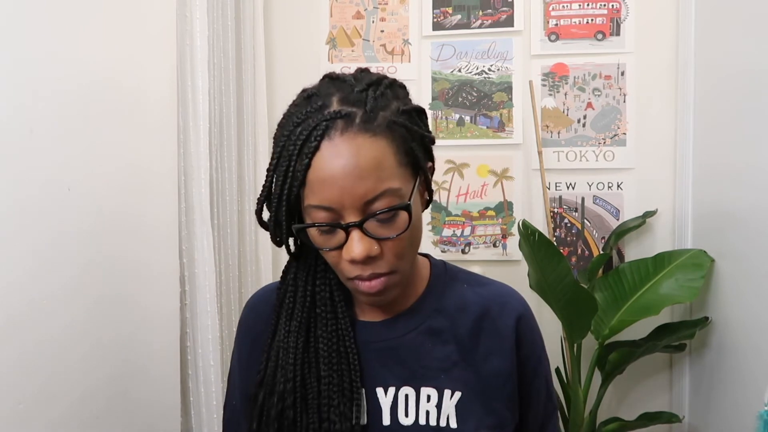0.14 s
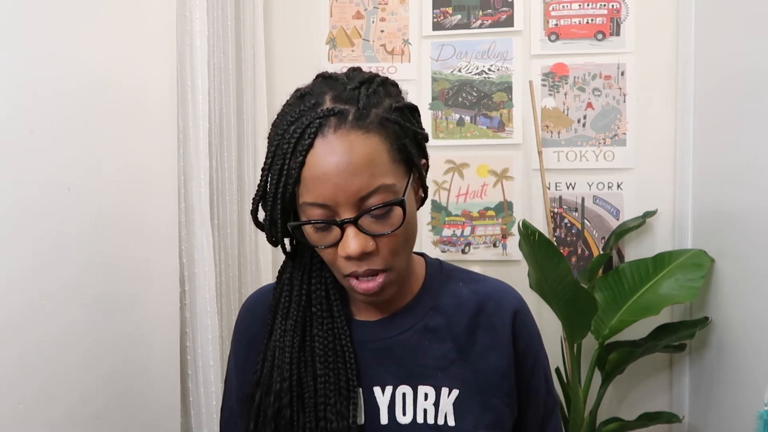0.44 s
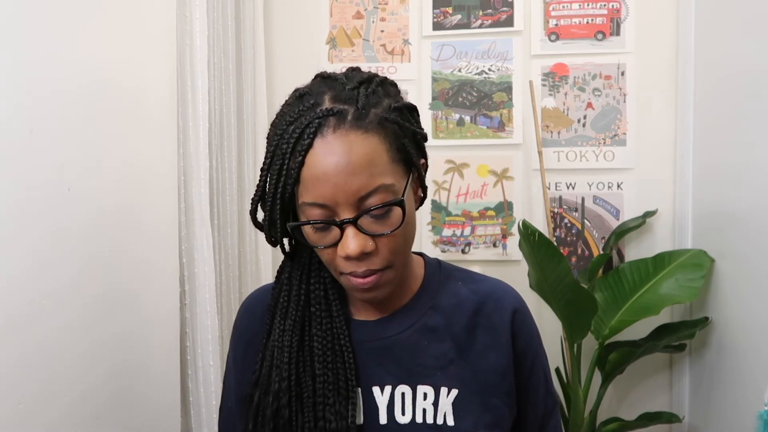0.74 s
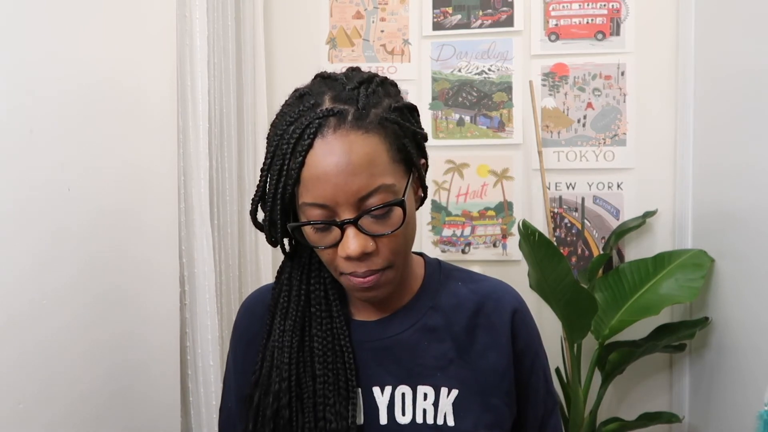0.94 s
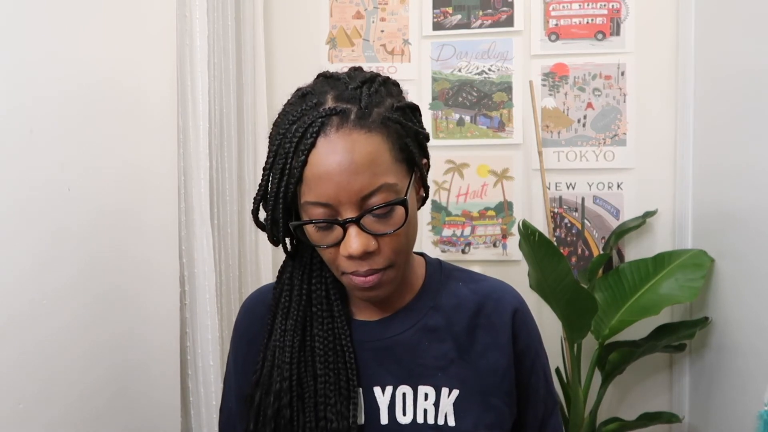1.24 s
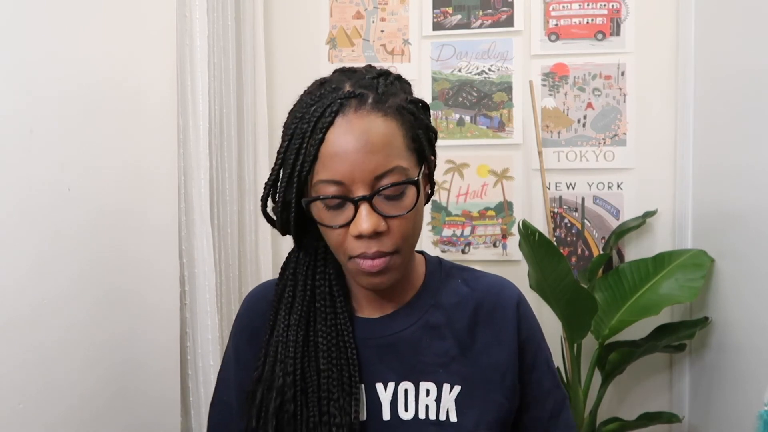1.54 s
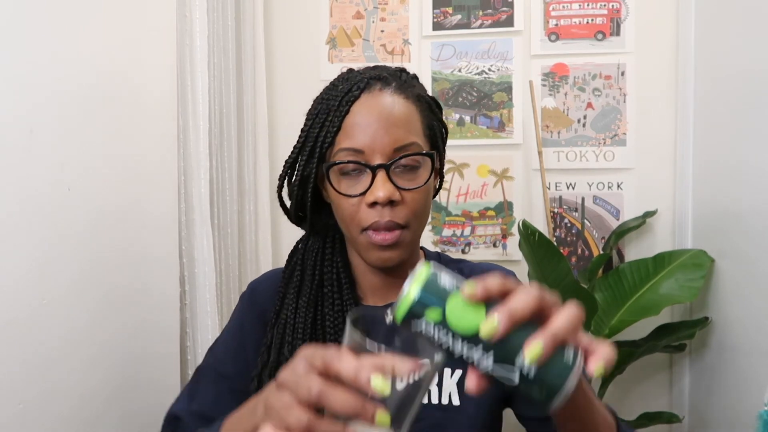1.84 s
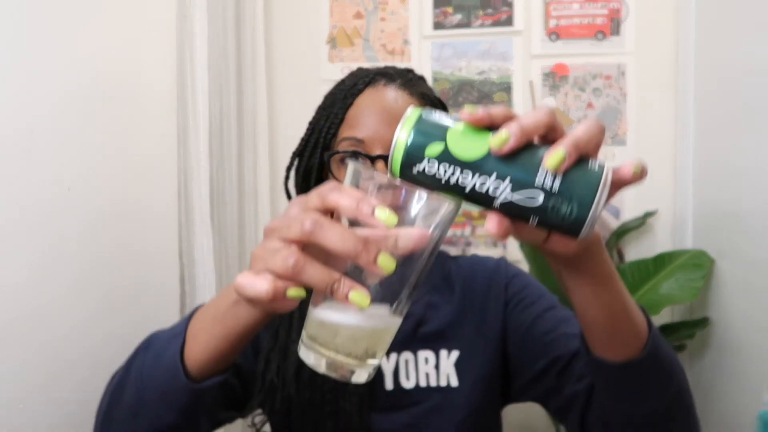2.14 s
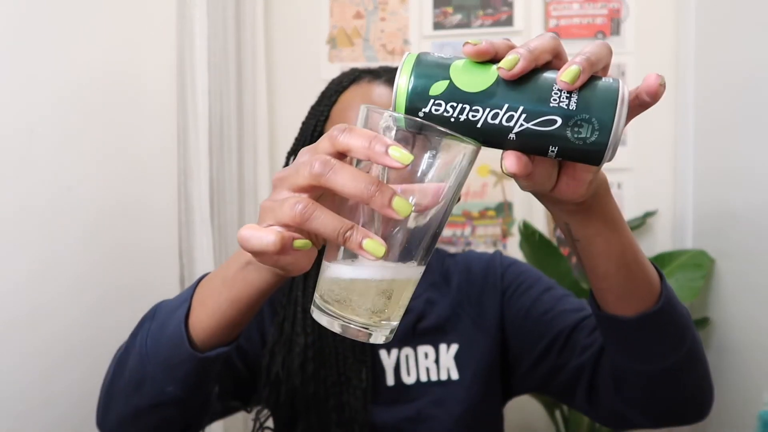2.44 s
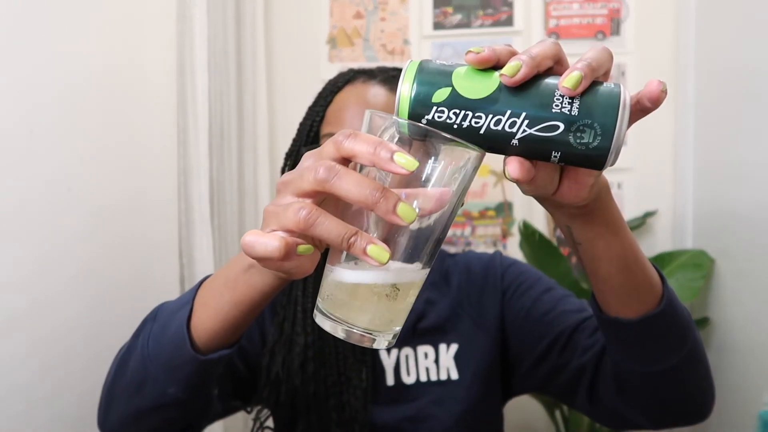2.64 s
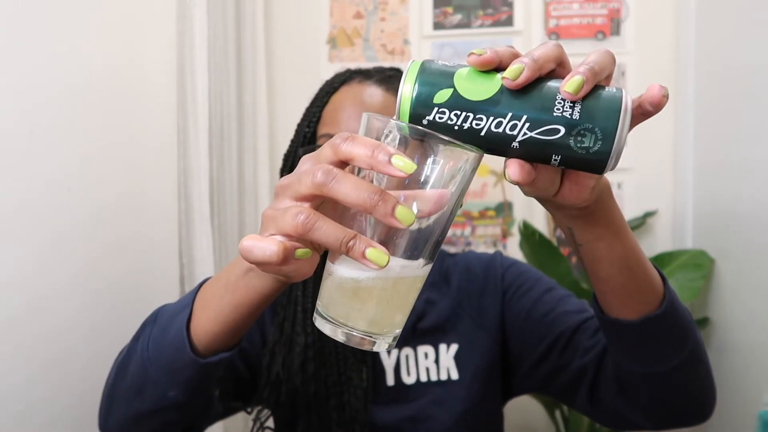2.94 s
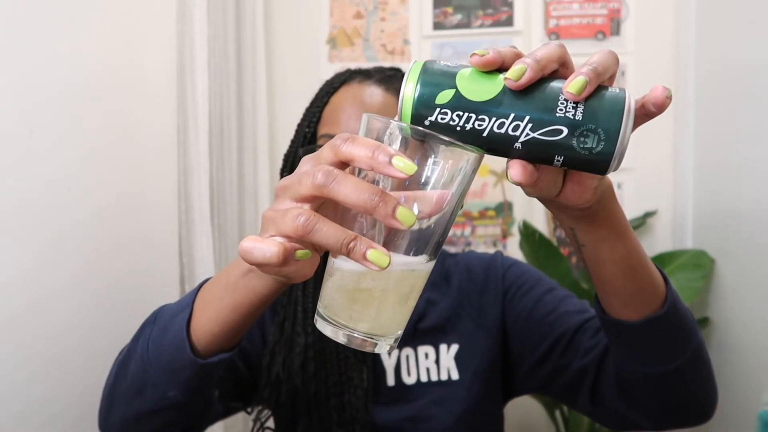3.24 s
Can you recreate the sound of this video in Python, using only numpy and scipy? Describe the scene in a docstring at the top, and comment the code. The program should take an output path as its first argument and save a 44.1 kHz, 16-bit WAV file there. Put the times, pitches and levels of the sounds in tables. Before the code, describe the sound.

Sparkling drink glugs and splashes into a glass, fizzing, with two light knocks near the end

```python
"""Fizzy juice poured from a can

Juice gushes into a glass in a small room in two spells of gulps, splashes and droplets; foam fizzes on.
Bubbles and blobs are damped sines, splashes and spits are noise puffs, and dense grains make foam and jet.
Resonant filters stand for the air in the glass and for the can, which knock lightly together twice.
An appliance hums, the building rumbles underneath and a faint hiss lies over all."""
import sys
import numpy as np
from scipy import signal
from scipy.fft import rfft, irfft, next_fast_len
from scipy.io import wavfile

SR = 44100
rng = np.random.default_rng(int(sys.argv[2]) if len(sys.argv) > 2 else 0)


def to_wav(sig):
    """Store sig (one row per channel, or 1-D mono) as 16-bit WAV at the path in sys.argv[1].

    Samples outside -1..1 are clipped; the rate is SR.
    """
    pcm = np.clip(np.atleast_2d(sig), -1, 1) * 32767
    pcm = np.round(pcm).astype(np.int16)
    wavfile.write(sys.argv[1], SR, pcm.T)  # frames by channels


N = 149940  # length in samples

# Lowest note of the air in the glass. Each row: time in seconds, frequency in Hz.
GLASS_NOTE = [(.4, 639), (.75, 667), (1.0, 684), (1.35, 722), (1.55, 754), (1.66, 774), (1.9, 696),
              (2.4, 681), (3.0, 697), (3.4, 750)]


def amp(db):
    """A level in decibels is 20 times the logarithm of an amplitude ratio."""
    return 10 ** (np.asarray(db) / 20)


def unit(x):
    """Dividing by the root mean square leaves a signal of unit power."""
    return x / np.sqrt(np.mean(x ** 2) + 1e-20)


def along(points, hz):
    """Values given at a few frequencies are interpolated on a logarithmic frequency axis."""
    f, values = np.transpose(points)
    return np.interp(np.log(hz + 1), np.log(f), values)


def gains(rows):
    """Levels interpolated linearly in dB become one gain per sample for each column after the time."""
    s, *columns = np.transpose(rows)
    t = np.arange(N) / SR
    return [amp(np.interp(t, s, levels)) for levels in columns]


def add(out, s, sound):
    """Superposition: a sound is summed into the mix from the given second on."""
    part = out[max(0, round(s * SR)):][:len(sound)]
    part += sound[:len(part)]


def coloured(x, points, resonances=()):
    """Minimum-phase filter of unit power, from a broad colour and resonances (Hz, width Hz, dB)."""
    m = 2 * next_fast_len(N // 2 + 8192)
    hz = np.fft.rfftfreq(m, 1 / SR)
    peaks = sum(amp(db) ** 2 / (1 + (2 * (hz - f) / width) ** 2) for f, width, db in resonances)
    magnitude = unit(amp(along(points, hz)) * np.sqrt(1 + peaks))
    # Folding the cepstrum onto positive times makes the response causal.
    cepstrum = irfft(np.log(magnitude))
    cepstrum[1:m // 2] *= 2
    cepstrum[m // 2 + 1:] = 0
    return irfft(rfft(x, m) * np.exp(rfft(cepstrum)), m)[:N]


def grains(per_s, low_hz, high_hz, cycles, spread_db, size):
    """Many tiny bubbles at random times, each a sine decaying by 1/e in the given cycles, sum to rms 1."""
    when, pitch, strength = rng.random((int(per_s * N / SR), 3)).T[:, :, None]
    k = np.arange(size)
    turns = low_hz * (min(high_hz, SR / 2) / low_hz) ** pitch * k / SR
    waves = amp(spread_db * strength ** 2) * np.sin(2 * np.pi * turns) * np.exp(-turns / cycles)
    samples = (when * N).astype(int) + k
    return unit(np.bincount(samples.ravel(), waves.ravel(), N)[:N])


def bursts(rows, rise_s, ripple_db, size=40):
    """Turbulent puffs, rows (s, dB, t60[, brightest Hz]): decaying noise with a random spectral ripple."""
    peak_db, peak_width_oct = 8, .35
    out, t = np.zeros(N), np.arange(SR // 4) / SR
    hz = np.fft.rfftfreq(len(t), 1 / SR) + 1
    places = np.linspace(0, size - 1, len(hz))
    for s, db, t60, *peaks in rows:
        colour = ripple_db * np.interp(places, np.arange(size), rng.standard_normal(size))
        colour += sum(peak_db / (1 + (np.log2(hz / f) / peak_width_oct) ** 2) for f in peaks)
        noise = unit(irfft(rfft(rng.standard_normal(len(t))) * amp(colour), len(t)))
        envelope = np.minimum(t / rise_s, 1) * np.exp(-np.log(1000) * t / t60)
        add(out, s, amp(db) * envelope * noise)
    return out


def ring(hz, t60):
    """A damped mode is a sine whose amplitude falls 60 dB in t60 seconds."""
    t = np.arange(SR // 4) / SR
    return np.sin(2 * np.pi * hz * t) * np.exp(-np.log(1000) * t / t60)


def air_modes(note_hz):
    """Modes (Hz, width Hz, dB) of an air column follow its lowest note, each to its own degree."""
    rest_hz = 700.4  # note at which the modes have their listed frequencies
    # Modes of the air in the glass. Each row: frequency in Hz, width in Hz, level in dB over the open
    # sound, share of the note's relative shift that is followed (exponent).
    air_column = [(387, 57, 0.5, 0.098), (700.8, 29.6, 17.5, 0.86), (933, 20, 1.5, 0.027), (1053, 49, 8, 0),
                  (1852, 133, 9.5, 0.42), (3015, 72, 4.5, 0.65), (3680, 63, 1, 0)]
    return [(hz * (note_hz / rest_hz) ** follow, width, db) for hz, width, db, follow in air_column]


def in_glass(x, colour, count=4):
    """Resonance of an air column: crossfaded filters follow the note as fill and tilt move it."""
    s, note = np.transpose(GLASS_NOTE)
    position = (note - note.min()) / np.ptp(note) * (count - 1)
    place = np.interp(np.arange(N) / SR, s, position)
    out = np.zeros(N)
    for k, hz in enumerate(np.linspace(note.min(), note.max(), count)):
        share = np.maximum(0, 1 - np.abs(place - k))
        out += coloured(x * share, colour, air_modes(hz))
    return out


def hiss():
    """Stationary broadband noise is white noise shaped by a fixed spectrum."""
    # Spectrum of the hiss. Each row: frequency in Hz, relative level in dB.
    hiss_colour = [(100, -3), (300, 6.5), (650, -13), (1200, 6.5), (3000, -2.5), (8000, -8.5), (16000, -9)]
    return amp(-64) * unit(coloured(rng.standard_normal(N), hiss_colour))  # rms dB


def rumble():
    """Building rumble is low-frequency noise whose level sways slowly."""
    # Spectrum of the rumble. Each row: frequency in Hz, relative level in dB.
    rumble_colour = [(25, -46.5), (33, -17.5), (41, -0.5), (55, 2.5), (68, 1), (80, -7.5), (100, -21),
                     (140, -22.5), (175, -30), (250, -39.5), (2000, -110)]
    # Sway of the rumble. Each row: time in seconds, rms level in dB.
    rumble_level = [(0, -30), (.17, -32), (.23, -25.5), (.45, -30), (.55, -32), (.74, -28), (.83, -32.5),
                    (1.5, -33), (1.85, -30), (2.1, -33.5), (2.3, -31.5), (2.45, -34), (3.4, -33.5)]
    level, = gains(rumble_level)
    return level * unit(coloured(rng.standard_normal(N), rumble_colour))


def hum():
    """Mains-driven vibration of an appliance is a steady pure tone."""
    hum_hz, hum_db = 119.6, -38  # rms level
    return amp(hum_db) * np.sqrt(2) * np.sin(2 * np.pi * hum_hz * np.arange(N) / SR)


def room(x, count=12):
    """Reverberation is convolution with decaying noise; several random tails crossfade evenly in turn."""
    wall_delay_s = .006
    # Decay of the room. Each row: frequency in Hz, time to fall 60 dB in seconds.
    room_t60 = [(200, 0.21), (800, 0.19), (3000, 0.17), (14000, 0.2)]
    out = np.zeros(N)
    for k in range(count):
        hz, t, spectrum = signal.stft(rng.standard_normal(SR // 2), SR, nperseg=256)
        decay = np.exp(-np.log(1000) * t / along(room_t60, hz)[:, None])
        tail = signal.istft(spectrum * decay, SR, nperseg=256)[1]
        share = np.maximum(0, 1 - np.abs(np.linspace(0, count - 1, N) - k))
        echo = signal.fftconvolve(x * np.sqrt(share), tail / np.linalg.norm(tail))
        add(out, wall_delay_s, echo)
    return out


def knocks():
    """Impact of can and glass excites a set of modes that die away quickly."""
    # Light knocks. Each row: start in seconds, level in dB.
    knock_times = [(2.802, -30), (3.132, -32)]
    # Modes of the struck bodies. Each row: frequency in Hz, relative level in dB, 60 dB decay in seconds.
    knock_modes = [(334, -30, 0.1), (393, -3.5, 0.12), (630, -6, 0.082), (867, -13, 0.062), (996, 1, 0.052),
                   (1505, -20, 0.048), (2262, -18, 0.064), (3260, -13, 0.027)]
    scatter_db = 1.5
    out = np.zeros(N)
    for s, db in knock_times:
        for hz, level, t60 in knock_modes:
            gain = amp(db + level + rng.normal(0, scatter_db))
            add(out, s, gain * ring(hz, t60))
    return out


def foam():
    """Foam is a dense shower of fizz, bursts and trickle grains, coloured by the air in the glass."""
    # Foam activity. Each row: time in seconds, fine fizz level in dB, bursting bubbles level in dB.
    foam_level = [(0, -72, -88), (.22, -60.5, -65), (.32, -61, -56), (.45, -54, -55.5), (.7, -55, -55.5),
                  (.95, -54.5, -48.5), (1.2, -52.5, -59), (1.5, -52, -53.5), (1.59, -44, -55),
                  (1.75, -47, -57), (1.83, -52, -66), (2.35, -53.5, -91), (2.56, -53.5, -88),
                  (2.8, -53.5, -61), (3.1, -53, -64), (3.4, -55.5, -71)]
    # Spectra of fizz, bursts and trickle. Each row: frequency in Hz, relative level in dB.
    fizz_colour = [(200, -11.5), (400, 4.5), (700, 0), (1200, -2.5), (1800, 4), (2600, 1), (3400, 3.5),
                   (5000, 0.5), (8000, 3), (12000, 4.5), (16000, 1)]
    pop_colour = [(400, -16), (1500, -3), (2500, 3.5), (3700, 6.5), (5200, -7), (7500, 3), (11000, -11.5),
                  (16000, 8)]
    trickle_colour = [(900, -7), (1800, 0.5), (2550, -11), (2900, 0.5), (3700, 6.5), (5200, -1),
                      (8000, -3.5), (12000, -4)]
    trickle_db = -0.5  # against the bursting bubbles
    fine, coarse = gains(foam_level)
    fizz = grains(per_s=4000, low_hz=2970, high_hz=15900, cycles=0.3, spread_db=-4.5, size=48)
    pops = grains(per_s=450, low_hz=3800, high_hz=16000, cycles=3, spread_db=18, size=200)
    trickle = grains(per_s=900, low_hz=1497, high_hz=8900, cycles=3, spread_db=10, size=500)
    bubbles = unit(in_glass(pops, pop_colour))
    bubbles += amp(trickle_db) * unit(in_glass(trickle, trickle_colour))
    return fine * unit(in_glass(fizz, fizz_colour)) + coarse * bubbles


def spits():
    """Spray spat from the foam is a puff of noise with a prominent high band."""
    # Sharp spits. Each row: start in seconds, level in dB, 60 dB decay in seconds, brightest band in Hz.
    spit_times = [(.068, -40.5, 0.06, 12000), (.268, -42, .07, 4100), (.279, -29.5, 0.041, 6650),
                  (.293, -31, .03, 6000), (.311, -29, 0.014, 5500), (.411, -43, 0.029, 4240),
                  (.535, -39.5, 0.032, 8100), (.706, -43, 0.018, 4500), (.918, -47, 0.028, 4170),
                  (.977, -36.5, 0.036, 6200), (1.047, -32, 0.024, 8100), (1.057, -34, 0.035, 9500),
                  (1.245, -42, 0.033, 4000), (1.298, -40.5, 0.027, 6000), (1.513, -28.5, 0.017, 10600),
                  (1.552, -31, 0.03, 6800), (2.803, -43.5, 0.078, 5740), (2.918, -39, 0.088, 14300)]
    # Spectrum of the spits. Each row: frequency in Hz, relative level in dB.
    spit_colour = [(300, -22), (2000, -13), (4000, 2.5), (9000, -1.5), (15500, -1.5)]
    return coloured(bursts(spit_times, rise_s=0.0021, ripple_db=2.5), spit_colour)


def droplets():
    """Impact and bubble resonance: a droplet's tap rings the glass air and leaves a small ringing bubble."""
    # Small droplets. Each row: start in seconds, peak level in dB, bubble pitch in Hz.
    drops = [(0.311, -35, 2820), (.371, -33.5, 2870), (.386, -39, 3770), (0.411, -28.5, 3750),
             (0.473, -35.5, 2800), (.918, -27.5, 3710), (1, -35, 2890), (1.246, -33, 3580),
             (1.297, -36.5, 3170), (1.421, -28.5, 3610), (1.492, -28.5, 3720), (3.087, -35, 2230)]
    # Spectrum of the taps. Each row: frequency in Hz, relative level in dB.
    tap_colour = [(600, -24), (1900, -4.5), (3700, 3), (6000, -10), (15000, -13)]
    ring_t60_s, tap_db, tap_t60_s = 0.028, -7.5, 0.03  # tap level is against the ring
    tap_rows = [(s, db + tap_db, tap_t60_s) for s, db, hz in drops]
    out = in_glass(bursts(tap_rows, rise_s=0.00027, ripple_db=5), tap_colour)
    for s, db, hz in drops:
        add(out, s, amp(db) * ring(hz, ring_t60_s))
    return out


def glugs():
    """Cavity resonance: air gulped into the can sloshes its contents and sprays at the mouth."""
    # Gulps of air. Each row: start in seconds, slosh level in dB, spray level in dB, 60 dB decay in seconds.
    glug_times = [(2.492, -37, -49, 0.14), (2.52, -37.5, -43, 0.12), (2.543, -41, -51, 0.23),
                  (2.582, -37, -45.5, 0.11), (2.6, -40.5, -50.5, 0.16), (2.651, -46, -47.5, 0.094),
                  (2.714, -41, -64, 0.22), (2.747, -38.5, -47, 0.13), (2.802, -30.5, -43, 0.067),
                  (2.904, -36.5, -42, 0.12), (2.939, -37.5, -44, 0.14), (3.086, -39.5, -60, 0.1),
                  (3.13, -36.5, -47.5, 0.12), (3.352, -40, -58, 0.17)]
    # Spectra of the hollow can and the swish at its mouth. Each row: frequency in Hz, relative level in dB.
    can_colour = [(200, -23), (400, 2.5), (620, 7.5), (820, -2), (1050, 5), (1280, -13), (1620, 2),
                  (1950, -8.5), (2300, -5), (2900, -18.5), (9000, -35)]
    swish_colour = [(400, -27), (1600, -5), (2800, -2), (3900, 5.5), (4900, -4), (5800, 2.5), (8500, -10),
                    (15000, -15)]
    slosh = bursts([(s, db, t60) for s, db, _, t60 in glug_times], rise_s=0.0019, ripple_db=2.5)
    spray = bursts([(s, db, t60) for s, _, db, t60 in glug_times], rise_s=0.0027, ripple_db=3)
    return coloured(slosh, can_colour) + coloured(spray, swish_colour)


def splashes():
    """Liquid slapping in the glass is a noise puff filtered by the resonant air."""
    # Slaps of liquid. Each row: start in seconds, level in dB, 60 dB decay in seconds.
    splash_times = [(.386, -33, 0.06), (.584, -27, 0.024), (.706, -30.5, 0.079), (1.2, -35, 0.17),
                    (1.552, -30, 0.037), (1.627, -28, 0.032), (1.653, -34, 0.066)]
    # Spectrum of the splashes. Each row: frequency in Hz, relative level in dB.
    splash_colour = [(100, -16), (250, -28), (380, -12.5), (520, -8), (700, -3.5), (850, -9.5),
                     (1050, -4.5), (1350, -5), (1750, -4), (2250, -9.5), (2700, -15), (4000, -11),
                     (8000, -24), (16000, -50)]
    return in_glass(bursts(splash_times, rise_s=0.0012, ripple_db=2.0), splash_colour)


def stream():
    """Air entrainment: the jet churns up a crowd of bubbles that ring through the air in the glass."""
    # Strength of the stream. Each row: time in seconds, rms level in dB.
    flow_level = [(0, -55), (.27, -62.5), (.36, -58), (.5, -58.5), (.8, -55.5), (1.05, -48.5), (1.15, -58),
                  (1.38, -52.5), (1.44, -38.5), (1.51, -47), (1.57, -36), (1.66, -34.5), (1.715, -63),
                  (2.46, -59), (2.55, -49.5), (2.83, -49.5), (2.93, -44), (3.02, -48), (3.15, -45),
                  (3.25, -49.5), (3.4, -52.5)]
    # Spectrum of the stream. Each row: frequency in Hz, relative level in dB.
    stream_colour = [(150, -36), (270, -22), (350, -3), (520, -11.5), (720, 2), (950, 2), (1300, -0.5),
                     (1900, -9), (2700, -11), (5000, -36), (12000, -66)]
    flow, = gains(flow_level)
    churn = grains(per_s=1100, low_hz=301.4, high_hz=2430, cycles=4.0, spread_db=10.0, size=2400)
    return flow * unit(in_glass(churn, stream_colour))


def plops():
    """Impulse excitation: a blob striking the surface rings all modes of the air in the glass at once."""
    # Blobs of liquid. Each row: start in seconds, level in dB, brightness in dB per octave.
    blobs = [(.311, -32, 1.5), (.356, -23.5, -3.5), (.369, -25, -0.5), (.385, -40, 6), (.661, -42, 5),
             (.706, -31.5, 2.5), (.977, -26, -1.5), (1.2, -31.5, 1), (1.365, -36, 2), (1.401, -29.5, -1),
             (1.421, -24, -4), (1.441, -26.5, 1), (1.491, -44, 9.5), (1.524, -28.5, -5),
             (1.552, -20.5, -1.5), (1.594, -28, -3), (1.622, -27, -7), (1.628, -24, -5), (1.653, -27.5, -2),
             (1.667, -35.5, -6)]
    scatter_db = 2
    plop_low_hz = 560  # the high-pass keeps the plops free of low thump
    out = np.zeros(N)
    for s, db, brightness_db in blobs:
        note = np.interp(s, *np.transpose(GLASS_NOTE))
        modes = air_modes(note)
        top = max(level for hz, width, level in modes)
        for hz, width, level in modes:
            tilt_db = brightness_db * np.log2(hz / note)
            gain = amp(db + level - top + tilt_db + rng.normal(0, scatter_db))
            t60 = np.log(1000) / (np.pi * width)  # a wider resonance decays faster
            add(out, s, gain * ring(hz, t60))
    highpass = signal.butter(N=2, Wn=plop_low_hz, btype="highpass", fs=SR, output="sos")
    return signal.sosfilt(highpass, out)


def gulps():
    """Bubble resonance: large bubbles swell and ring, mostly near the pitch of the air in the glass."""
    # Big air bubbles. Each row: start in seconds, peak level in dB, pitch in Hz, rise in seconds,
    # fade in seconds (to 1/e).
    big_bubbles = [(.376, -33, 940, 0.003, 0.0085), (.385, -28, 1038, 0.0015, 0.012),
                   (.583, -17, 797, 0.0031, 0.0026), (.587, -23.5, 657, 0.0052, 0.019),
                   (.64, -30.5, 707, 0.0069, 0.0039), (.705, -18.5, 817, 0.0025, 0.0032),
                   (.711, -22.5, 682, 0.0023, 0.0094), (.772, -31.5, 663, 0.0053, 0.026),
                   (.871, -20, 696, 0.006, 0.015), (.918, -28, 640, 0.0041, 0.021),
                   (.976, -4, 681.5, 0.0059, 0.007), (.992, -20, 692, 0.003, 0.018),
                   (1.047, -18, 671, 0.0036, 0.0064), (1.242, -25.5, 692, 0.0015, 0.011),
                   (1.566, -27, 744, 0.0055, 0.032), (1.652, -22, 832, 0.0034, 0.0029),
                   (2.49, -29, 1060, 0.0025, 0.0044), (2.498, -36.5, 449, 0.0042, 0.012),
                   (2.543, -17, 611, 0.0051, 0.0044), (2.544, -29, 1047, 0.0029, 0.0054),
                   (2.558, -28, 596, 0.0036, 0.022), (2.594, -36.5, 532, 0.0044, 0.017),
                   (2.65, -25, 660, 0.0044, 0.0058), (2.85, -19, 704, 0.0014, 0.0087),
                   (2.866, -30.5, 786, 0.0026, 0.02), (2.917, -27, 670, 0.0034, 0.0056),
                   (2.937, -28, 696, .005, 0.015), (2.939, -27.5, 378.6, 0.0052, 0.0062)]
    fade_shape = 1.64  # exponent that curves the fade
    glide_per_s = 0.079  # relative rise of pitch
    out, t = np.zeros(N), np.arange(SR // 5) / SR
    for s, db, hz, rise, fade in big_bubbles:
        swell = np.sin(np.pi / 2 * np.minimum(t / rise, 1)) ** 2
        decay = np.exp(-(np.maximum(t - rise, 0) / fade) ** fade_shape)
        tone = np.sin(2 * np.pi * hz * (t + glide_per_s * t ** 2 / 2))
        add(out, s, amp(db) * swell * decay * tone)
    return out


def scene():
    """Direct sound, reverberation and background superpose linearly."""
    pour = knocks() + foam() + spits() + droplets() + glugs()
    pour += splashes() + stream() + plops() + gulps()
    background = hum() + rumble() + hiss()
    return (pour + amp(-7) * room(pour) + background)[None]  # room gain in dB


def record(dry):
    """Band limiting: spectral components at and above 16 kHz are removed."""
    m = next_fast_len(N + 8192)
    passband = np.fft.rfftfreq(m, 1 / SR) < 16000
    return irfft(rfft(dry, m) * passband, m)[..., :N]


dry = scene()
out = record(dry)
to_wav(out)
```